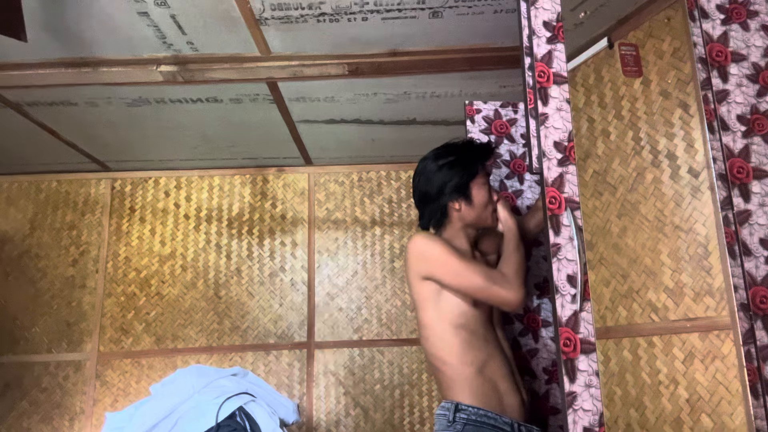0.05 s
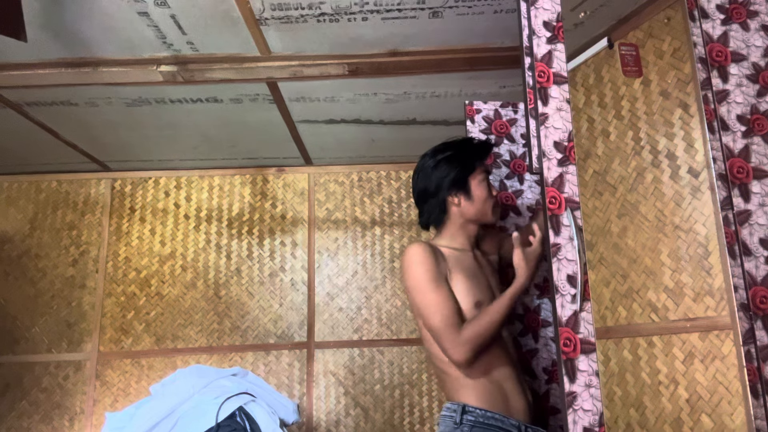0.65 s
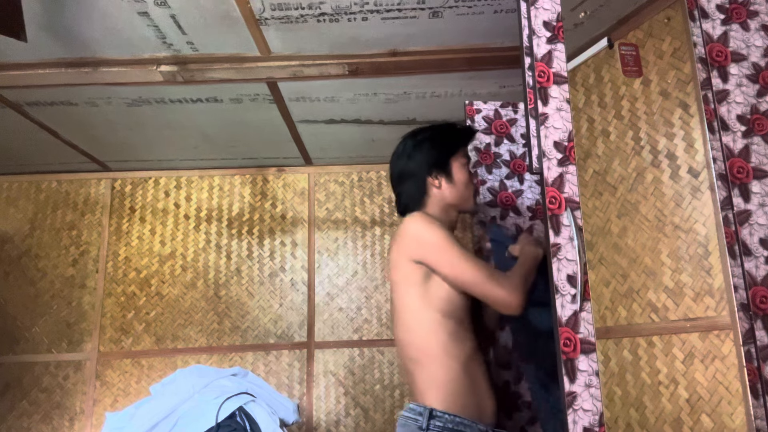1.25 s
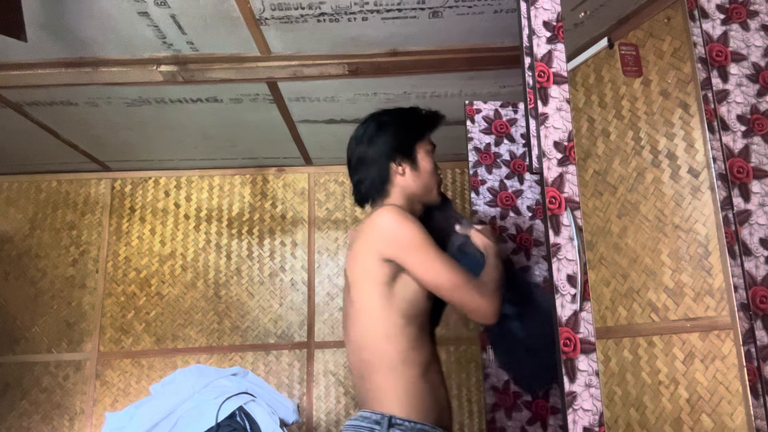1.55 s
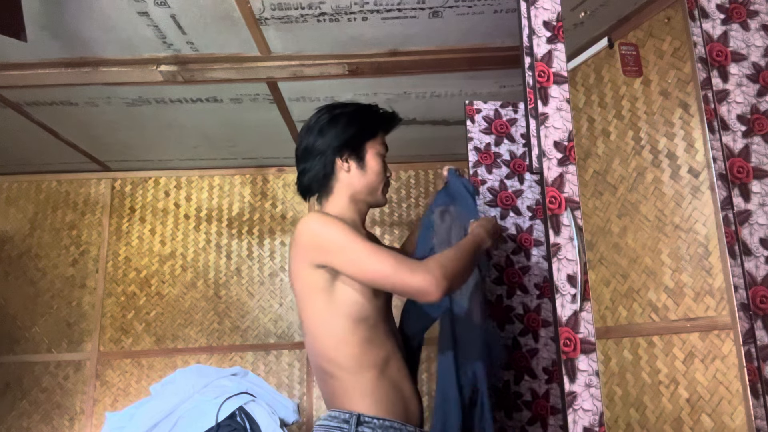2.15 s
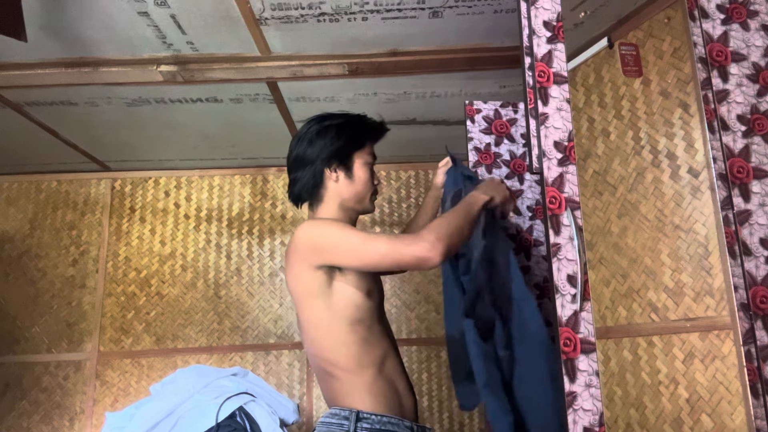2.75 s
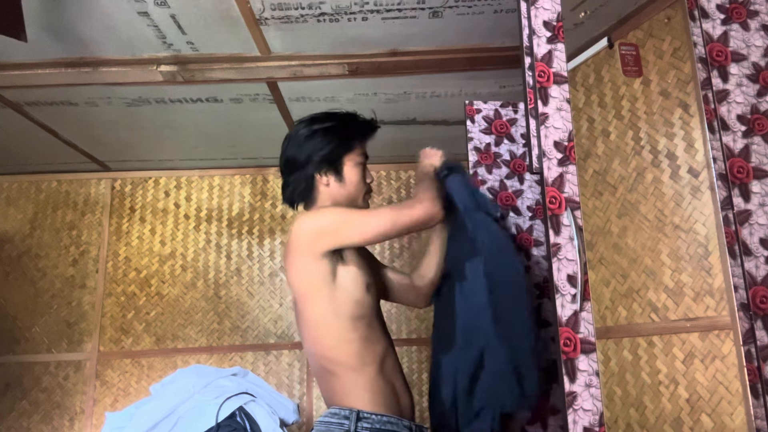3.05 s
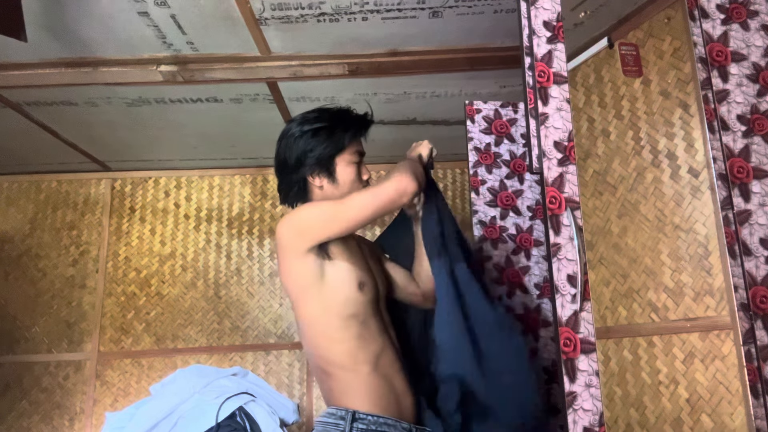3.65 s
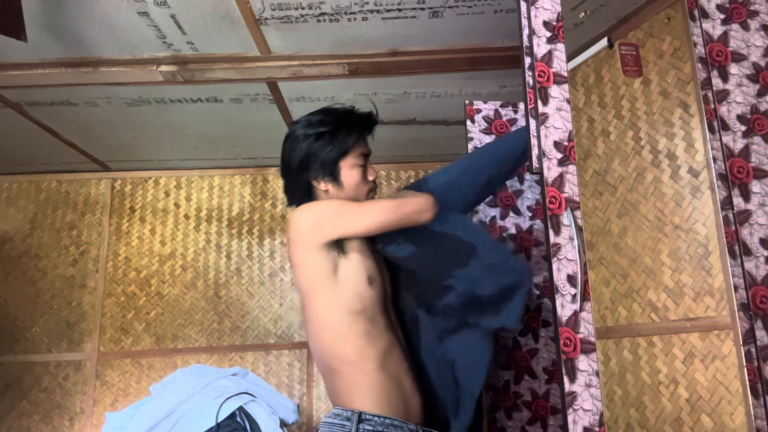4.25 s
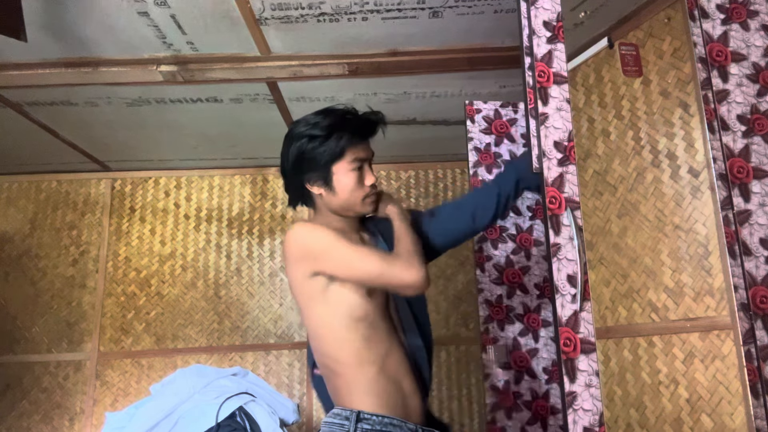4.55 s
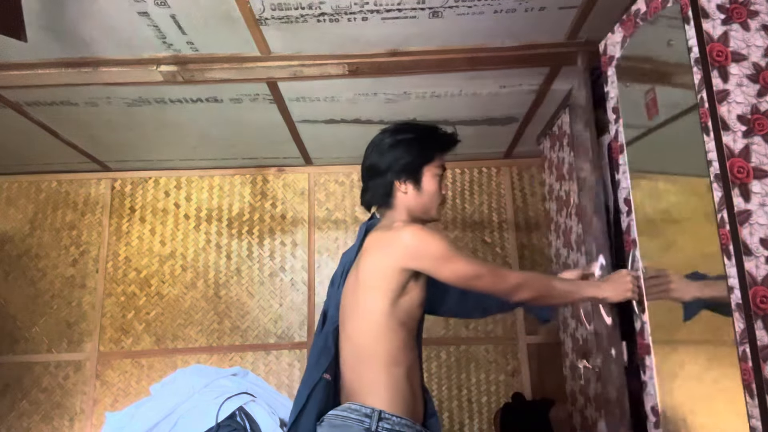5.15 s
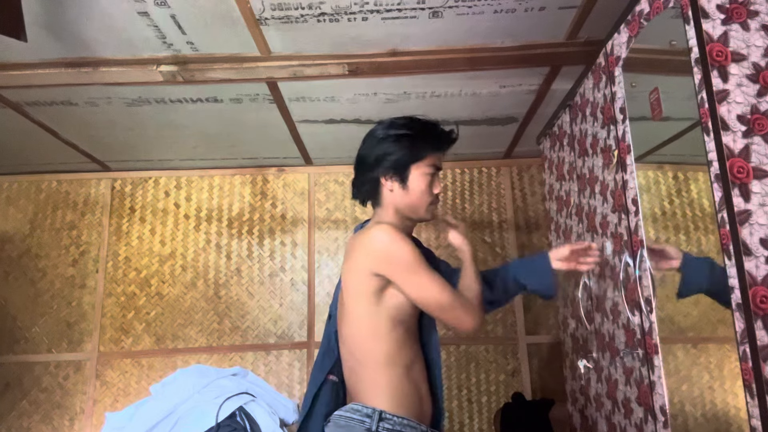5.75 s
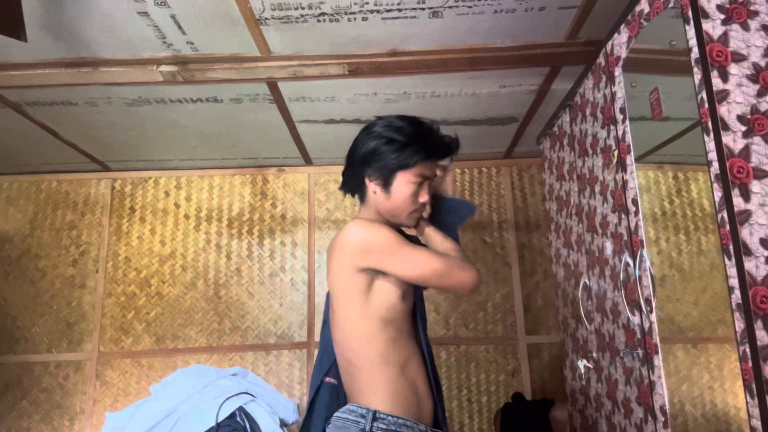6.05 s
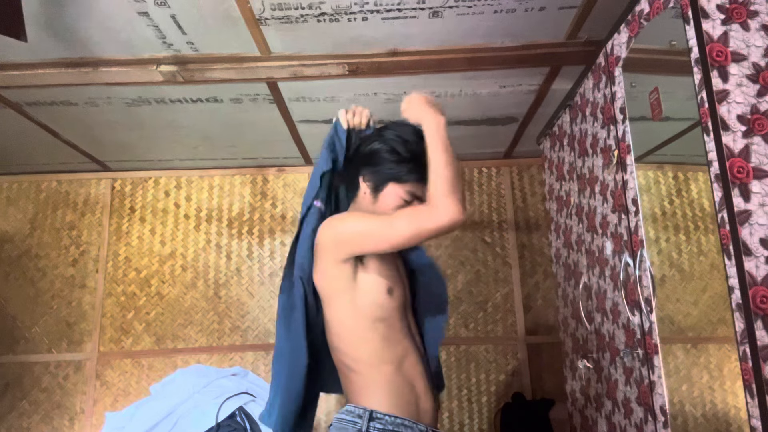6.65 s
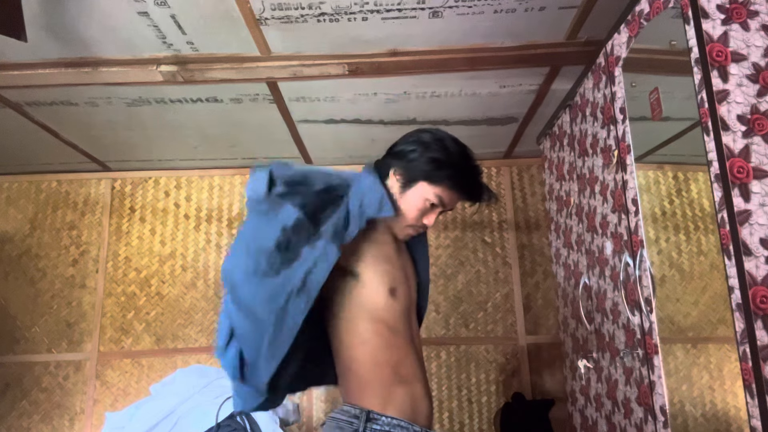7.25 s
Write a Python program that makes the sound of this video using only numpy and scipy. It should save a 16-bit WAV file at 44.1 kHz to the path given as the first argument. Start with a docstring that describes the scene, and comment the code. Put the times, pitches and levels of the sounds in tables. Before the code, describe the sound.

A tight wooden wardrobe door scrapes and knocks, and a hanger rattles briefly as a shirt is taken out. The fabric rubs, crinkles and flaps while someone pulls it on. Several dull knocks and a metallic click lead to the door closing with a low thud, followed by more soft rustling. Everything is heard from nearby in a small room with a quiet rumble underneath.

```python
"""A soft scuff of cloth over a low rumble comes first; then a wooden wardrobe door judders and knocks.
In the small room a hanger clinks, and a shirt is taken out and pulled on: it rubs, buckles and flaps.
The catch snaps, the door thuds shut and the cloth rustles on. The sound cuts out twice for an instant.
Impacts and stick-slip friction excite the damped modes of wood and metal; the cloth is friction noise,
shaped by each stroke and coloured by reflections from close surfaces."""
import sys
import numpy as np
from scipy import signal
from scipy.fft import rfft, irfft
from scipy.io import wavfile
from scipy.ndimage import uniform_filter1d

SR = 44100
rng = np.random.default_rng(int(sys.argv[2]) if len(sys.argv) > 2 else 0)


def dump(signal):
    """Clip the signal to [-1, 1] and save it as 16-bit WAV at the path in sys.argv[1]."""
    limited = np.clip(np.atleast_2d(signal).T, -1, 1)
    pcm = np.round(limited * 32767).astype(np.int16)
    wavfile.write(sys.argv[1], SR, pcm)


N = 326272
TIME = np.arange(N) / SR
TAIL = TIME[:SR]  # time axis of an impulse response

# reverberation of the room: (frequency [Hz], t60 [s])
ROOM_T60 = [(80, 0.97), (260, 0.35), (700, 0.54), (2000, 0.44), (5000, 0.82), (12000, 0.039)]
# stereo width: (frequency [Hz], side minus mid [dB])
WIDTH = [(40, -16), (75, -15), (170, -10.5), (300, -6), (500, -1.5), (1100, -2.5), (3500, -1.5),
         (6000, 1.5), (8200, -2), (9400, -31), (10500, -33), (11800, 4), (15000, 0.5)]
# silent instants: (start [s], end [s])
DROPOUTS = [(4.668, 4.718), (7.301, 7.348)]
# shifts of weight that sway floor and cabinet: (start [s], level [dB], decay [dB/s])
HEAVES = [(-.07, -40.5, 170), (.3, -40.5, 36), (.64, -38.5, 17.5), (4.88, -45.5, 18), (5.52, -34, 27.5)]
# noise spectra of room, cloth, wood and metal: (frequency [Hz], relative spectral density [dB])
AIR_COLOUR = [(25, -9), (60, 7.5), (120, -10), (175, 4), (250, -33.5), (500, -38), (1000, -31),
              (3000, -34.5), (8000, -46), (15000, -61)]
SWAY_COLOUR = [(20, -59), (33, -7), (48, 1), (70, -1), (105, -10), (170, -16), (260, -24), (600, -91)]
RUB_COLOUR = [(100, -9), (300, -5), (800, 2.5), (1500, 3.5), (3000, 2), (5000, -0.5), (7000, -3),
              (9000, -2), (11000, -4.5), (13000, -13), (15000, -3)]
FOLD_COLOUR = [(60, -1.5), (150, 6.5), (300, 5.5), (550, -1.5), (680, -0.5), (810, -3.5), (1000, -8.5),
               (1400, -8), (2500, -12.5), (6000, -31)]
FLAP_COLOUR = [(40, -34), (88, 17.5), (140, -20), (300, 5), (500, -6.5), (1000, -6.5), (3000, -42),
               (8000, -30)]
CREASE_COLOUR = [(150, -3), (800, 0), (1500, -7), (3000, -22), (8000, -31)]
FRAME_COLOUR = [(40, -25), (90, 2.5), (145, -3.5), (220, -2.5), (300, -10.5), (500, -23.5), (800, -27.5),
                (1120, -23), (1450, -37.5), (3000, -49.5), (8000, -74)]
RASP_COLOUR = [(150, -12), (400, 11), (600, 8), (800, 7.5), (1180, 8), (1450, -6.5), (1900, -3.5),
               (3200, -15), (8000, -23), (14000, -63)]
BOOM_COLOUR = [(30, -20), (60, 7), (100, -6), (160, 5), (205, -8.5), (245, -12), (310, -4), (500, -23),
               (1200, -58)]
PANEL_COLOUR = [(100, -5), (220, 2.5), (310, 7), (500, 1.5), (700, -6.5), (950, -9), (1300, -20.5),
                (2500, -24.5), (6000, -38.5)]
CRACK_COLOUR = [(200, 7), (550, 17.5), (950, 13.5), (1400, 8.5), (2200, -0.5), (3500, -8.5), (7000, -28),
                (14000, -60)]
METAL_COLOUR = [(400, 4), (1200, 4.5), (2100, 9.5), (3300, 6), (6000, -0.5), (8500, 0), (11000, -1.5),
                (15000, -32)]

# cloth sliding over cloth and skin: (start [s], rise [s], length [s], hiss [dB], loose folds [dB])
STROKES = [(-.02, 0.018, 0.01, -66.5, -63), (0.19, 0.033, 0.056, -75.5, -89), (0.38, 0.026, .17, -82, -77),
           (0.543, 0.057, 0.12, -74, -72), (0.646, 0.046, 0.517, -68, -55.5),
           (1.086, 0.19, 0.43, -63.5, -55), (1.603, 0.011, 0.098, -65.5, -60.5),
           (1.717, 0.056, 0.08, -59.5, -78), (1.817, 0.024, 0.16, -66.5, -53),
           (1.944, 0.027, 0.22, -66.5, -85), (2.14, 0.15, 0.87, -74, -70.5),
           (2.514, 0.091, 0.089, -66, -56.5), (2.776, 0.13, 0.034, -60.5, -116),
           (3.044, 0.026, 0.26, -59, -50), (3.071, 0.076, 0.1, -52.5, -52.5), (3.316, 0.1, 0.66, -65, -57),
           (3.646, 0.031, 0.031, -65, -50), (3.788, 0.072, 0.29, -57, -53), (4.08, 0.083, 0.31, -59, -54.5),
           (4.463, 0.071, 0.11, -62, -62), (4.725, 0.025, 0.37, -76.5, -75), (4.917, 0.11, 0.4, -66, -60),
           (5.492, 0.056, 0.081, -65, -78), (5.773, 0.012, 0.14, -72.5, -76),
           (5.943, 0.27, 0.44, -66.5, -68), (6.129, 0.042, 0.04, -86, -55.5),
           (6.42, 0.094, 0.28, -69, -65.5), (6.578, 0.23, 0.46, -63, -61), (6.887, 0.089, 0.13, -61, -55.5),
           (7.03, 0.076, 0.48, -61.5, -57)]
# an arm in the sleeve: (start [s], length [s], first, middle and last thread rate [Hz], level [dB])
SLEEVE_ZIPS = [(3.129, 0.054, 3100, 2700, 2550, -51), (3.761, 0.085, 1410, 1600, 3000, -53),
               (3.825, 0.28, 2830, 4340, 4440, -56), (3.86, .2, 5980, 7850, 5600, -54.5),
               (4.19, 0.2, 6300, 6500, 3960, -59)]
# cloth scuffing over a hollow fold: (start [s], length [s], resonance [Hz], level [dB])
SCUFFS = [(0.0, 0.037, 2600, -68), (6.131, 0.15, 990, -60.5), (6.546, 0.037, 740, -56.5),
          (6.798, 0.026, 694, -55.5), (7.234, .06, 1290, -58.5)]
# creases buckling: (time [s], level [dB])
CREASES = [(1.875, -57), (1.935, -57), (1.953, -53), (1.967, -50), (3.075, -58), (3.14, -56), (3.272, -48),
           (3.374, -57), (3.848, -50), (3.873, -51), (4.303, -55), (6.812, -61)]
# the shirt pulled taut: (time [s], level [dB], time constant [s])
FLAPS = [(1.814, -49.5, 0.024), (3.071, -48, 0.016), (3.227, -42.5, 0.027), (3.27, -48, 0.013),
         (3.654, -46.5, 0.034), (3.856, -50, 0.027), (4.295, -42.5, 0.023), (7.207, -53, 0.0089)]

# pushes that drag the door in its frame: (start [s], rise [s], length [s], slip force [dB], rasp [dB])
PUSHES = [(0.188, 0.039, 0.11, -32.5, -63), (0.649, 0.032, 0.046, -25, -63),
          (0.691, 0.026, 0.034, -30.5, -41), (0.742, 0.019, 0.044, -31.5, -48),
          (5.386, 0.036, 0.06, -46, -54.5), (5.432, 0.024, 0.034, -36, -51),
          (5.548, 0.064, 0.095, -29.5, -48), (5.682, 0.024, 0.116, -45, -56.5),
          (5.778, 0.028, 0.066, -46, -61)]
# blows on the wardrobe: (time [s], cabinet boom [dB], door panel [dB], edge crack [dB])
BLOWS = [(0.674, -41, -49, -78), (0.698, -27, -49, -57), (0.838, -58, -31.5, -35),
         (.849, -26.5, -26.5, -42), (0.887, -47, -66, -46), (1.3, -38.5, -40.5, -41),
         (4.729, -48, -72, -86), (4.929, -45, -50, -57), (4.959, -40, -75, -80), (5.037, -37, -41, -58),
         (5.143, -38, -42.5, -38.5), (5.199, -38.5, -65, -59), (5.314, -62, -36, -56),
         (5.331, -32, -38, -68), (5.457, -52, -56, -37.5), (5.479, -16.5, -34.5, -47),
         (5.532, -23.5, -54, -66), (5.586, -25.5, -38, -48), (5.626, -50, -46, -45.5),
         (5.661, -30, -45, -63)]
# impacts on the smaller parts: (time [s], level [dB])
HANGER_CLINKS = [(1.393, -44), (1.409, -46), (1.445, -50), (1.751, -67), (1.773, -59), (1.792, -57.5),
                 (2.576, -62.5)]
HOOK_TICKS = [(1.487, -45.5), (1.758, -51.5)]
BUTTON_TAPS = [(1.63, -57.5)]
CATCH_SNAPS = [(4.928, -59.5), (5.017, -40.5)]
SHELF_KNOCKS = [(1.301, -29), (1.352, -32.5), (5.479, -42.5), (5.56, -43)]
# normal modes of each part: (frequency [Hz], relative level [dB], t60 [s])
HANGER_MODES = [(1550, -0.5, 0.29), (2094, 1, 0.17), (2338, 6, 0.16), (2404, -3, 0.28), (2892, -0.5, 0.16),
                (3910, 5, 0.17), (4480, 4.5, 0.065), (6050, 0, 0.079), (6640, -1, 0.081)]
HOOK_MODES = [(3470, -2, 0.22), (3560, 0, 0.065), (3850, 4, 0.083)]
BUTTON_MODES = [(1560, -1, .025), (1960, 0, 0.046), (2770, -12, 0.022)]
CATCH_MODES = [(1865, 3, 0.16), (1925, 4.5, 0.19), (2174, 2, 0.17), (2870, 5, 0.13), (3400, -3, .08),
               (4570, -1, 0.13), (7870, 0, 0.037), (8270, 3.5, 0.092)]
FRAME_MODES = [(102.5, -0.5, 0.18), (134.3, 7.5, 0.082), (163.25, -6.5, 0.4), (186, -10.5, 0.78),
               (233.5, -2.5, 0.15), (292.8, 2, 0.085), (375, -8, 0.25), (716, -10, 0.074),
               (1107, -18, 0.26), (1220, -24.5, 0.28)]  # the door frame with its mirror
CABINET_MODES = [(50, 0, 0.43), (73, 7, 0.37), (88.8, 16, 0.21), (139.6, 9.5, 0.15), (156.1, 2, 0.36),
                 (245.7, 0.5, 0.16), (292.4, -17, 0.37)]
PANEL_MODES = [(350, 3, 0.19), (383, 6.5, 0.3), (462, 7, 0.35), (487, 6.5, 0.55), (836, 4.5, 0.096),
               (910, 1, 0.13), (984, -20, 0.4), (1240, -11.5, 0.29)]
EDGE_MODES = [(1254, 12, 0.013), (1780, -19, 0.034), (2732, -11, 0.083)]
SHELF_MODES = [(141.6, -3, 0.16), (299.4, 5, 0.27), (355, 9, 0.15), (395, -3.5, 0.23), (505, -3, 0.17),
               (545, -1, 0.28), (773, -1.5, 0.33)]

STROKE_RELEASE_DB_PER_S = 127  # the cloth settles after each stroke
CRACK_GAIN, CRACK_S = 1.8, 0.014  # extra gain and time constant of an impact's onset
GRIP_S = 4.6  # from here on a hand holds the door


def amp(db):
    """Amplitude ratio of a level in decibels."""
    return 10 ** (np.asarray(db) / 20)


def rms_one(x):
    """Normalisation to unit rms."""
    return x / np.sqrt(np.mean(x ** 2) + 1e-20)


def at_hz(points, hz):
    """Interpolation of a table on a log-frequency axis."""
    freqs, values = np.transpose(points)
    return np.interp(np.log(np.maximum(hz, 1)), np.log(freqs), values)


def drift(per_s):
    """Random fluctuation of unit rms, linear between per_s values a second."""
    knots = rng.standard_normal(4096)
    return rms_one(np.interp(TIME * per_s, np.arange(len(knots)), knots))


def gesture(start, rise, length, release_db_per_s, sag_db_per_s=0):
    """Envelope of one movement: a smooth attack, a hold that may sag, an exponential release."""
    age = TIME - start
    attack = np.sin(np.pi / 2 * np.clip(age / rise, 0, 1)) ** 2
    sag_db = sag_db_per_s * np.maximum(age - rise, 0)
    release_db = release_db_per_s * np.maximum(age - length, 0)
    return attack * amp(-sag_db - release_db)


def colour(pair, spectrum):
    """Spectral shaping: two independent signals, as mid and side, give a stereo pair of unit rms."""
    size = pair.shape[1]
    hz = np.fft.rfftfreq(size, 1 / SR)
    mid, side = irfft(rfft(pair) * amp(at_hz(spectrum, hz)) * (hz > 15), size)
    side = irfft(rfft(side) * amp(at_hz(WIDTH, hz)), size)
    return rms_one(np.array([mid + side, mid - side]))


def noise(spectrum, size=N):
    """Gaussian stereo noise with a given spectrum."""
    return colour(rng.standard_normal((2, size)), spectrum)


def strikes(rows):
    """Brief contacts act as impulses, one per (time [s], level [dB])."""
    force = np.zeros(N)
    for time, db in rows:
        force[int(time * SR)] = amp(db)
    return force


def grains(per_s, spread_db):
    """A Poisson process: independent impulses of random size and sign."""
    size = amp(spread_db * np.minimum(rng.exponential(1, N), 4))
    return (rng.random(N) < per_s / SR) * size * rng.choice([-1, 1], N)


def excite(force, response):
    """A linear system convolves the force with its impulse response."""
    return signal.fftconvolve(force[None], response, axes=1)[:, :N]


def unit_attack(response):
    """Normalisation to unit rms over the first 30 ms."""
    return response / np.sqrt(np.mean(response[..., :int(0.03 * SR)] ** 2))


def diffuse(spectrum, direct, direct_s):
    """Reverberation: after a direct burst, each octave of the diffuse field decays at its own rate."""
    source = rfft(noise(spectrum, size=SR))
    hz = np.arange(SR // 2 + 1)
    octave = np.clip(np.log2(np.maximum(hz, 1) / 62.5), 0, 8)
    out = 0
    for k in range(9):
        band = irfft(source * np.maximum(1 - abs(octave - k), 0), SR)
        out += band * amp(-60 * TAIL / at_hz(ROOM_T60, 62.5 * 2 ** k))
    return unit_attack(out * (1 + direct * np.exp(-TAIL / direct_s)))


def near_walls(x, paths_ms, echo_db, travel_ms):
    """Comb filtering: echoes from close surfaces interfere, and their delays vary as the arms move."""
    out, n = x, np.arange(N)
    for path in paths_ms:
        lag = (path + travel_ms * drift(2.5)) * SR / 1000
        out = out + amp(echo_db) * np.array([np.interp(n - lag, n, channel) for channel in x])
    return out / np.sqrt(1 + len(paths_ms) * amp(2 * echo_db))


def ringing(modes, wander=0):
    """Free vibration is a sum of damped sinusoids; a phase difference between channels gives width."""
    out = 0
    for hz, db, t60 in modes:
        skew = np.arctan(amp(at_hz(WIDTH, hz))) * rng.choice([-1, 1]) * np.array([[1], [-1]])
        cycles = hz * np.cumsum(1 + wander * drift(50)[:SR]) / SR
        out += amp(db - 60 * TAIL / t60) * np.sin(2 * np.pi * cycles + skew)
    return unit_attack(out)


def wood(modes, spectrum, modes_db, room_db, rise_s):
    """Impulse response of a wooden part: modes and reverberation build up over the contact time."""
    wash = diffuse(spectrum, direct=0.8, direct_s=0.1)
    ring = ringing(modes, wander=0.0079)  # joints shift, so the pitch wanders
    return (amp(modes_db) * ring + amp(room_db) * wash) * (1 - np.exp(-TAIL / rise_s))


def background(swing):
    """Incoherent sources add in power: standing, swinging and heaving rock the floor under quiet air."""
    standing = amp(-61 + 0.5 * drift(2.7))
    rocking = amp(-5.5) * swing
    power = standing ** 2 + rocking ** 2
    for start, db, decay in HEAVES:
        power += (amp(db) * gesture(start, rise=0.061, length=0.061, release_db_per_s=decay)) ** 2
    return noise(SWAY_COLOUR) * np.sqrt(power) + amp(-59) * noise(AIR_COLOUR)


def strokes():
    """Envelopes of the cloth's rubbing and its folds' swinging; overlapping strokes add in power."""
    rub_power, swing_power = 0, 0
    for start, rise, length, hiss_db, folds_db in STROKES:
        power = gesture(start, rise, length, STROKE_RELEASE_DB_PER_S) ** 2
        rub_power += power * amp(hiss_db) ** 2
        swing_power += power * amp(folds_db) ** 2
    return np.sqrt(rub_power), np.sqrt(swing_power)


def rubbing(rub):
    """Friction noise: threads catch and slip in dense grains, more often as the sliding quickens."""
    per_s = 5000 * np.sqrt(rub / rub.max())
    threads = np.array([grains(per_s, spread_db=2.5), grains(per_s, spread_db=-5)]) / np.sqrt(per_s)
    hiss = colour(rms_one(threads) + 2.7 * rng.standard_normal((2, N)), RUB_COLOUR)
    return hiss * rub * amp(7 + 0.92 * drift(45))


def sleeve():
    """Threads crossing periodically make a narrow band of noise, a zip whose pitch follows arm speed."""
    blur_filter = signal.butter(2, 220, fs=SR, output="sos")
    out = 0
    for start, length, first_hz, middle_hz, last_hz, db in SLEEVE_ZIPS:
        along = np.clip((TIME - start) / length, 0, 1)
        hz = np.polyval(np.polyfit([0, 0.5, 1], [first_hz, middle_hz, last_hz], 2), along)
        cycles = np.cumsum(hz * (1 + 0.032 * drift(700))) / SR  # threads lie unevenly
        blur = rms_one(signal.sosfilt(blur_filter, rng.standard_normal((2, N))))
        arch = 2 * np.sqrt(along * (1 - along))
        out += amp(db) * arch * blur * np.sin(2 * np.pi * cycles)
    return out


def scuffs():
    """Cavity resonance: a hollow of the cloth selects one band of the friction noise."""
    friction, out = noise(RUB_COLOUR), 0
    for start, length, hz, db in SCUFFS:
        hollow = rms_one(signal.lfilter(*signal.iirpeak(hz, Q=2.9, fs=SR), friction))
        out += amp(db) * hollow * gesture(start, 0.024, length, STROKE_RELEASE_DB_PER_S)
    return out


def creases(swing):
    """Buckling: a taut crease gives way with a dry pop; small ones crinkle as the folds swing."""
    crinkles = amp(-11.5) * swing * grains(per_s=35, spread_db=1)
    return excite(strikes(CREASES) + crinkles, diffuse(CREASE_COLOUR, direct=4.3, direct_s=0.0032))


def folds(swing):
    """Moving cloth displaces air: loose folds murmur, and the shirt flaps when pulled taut."""
    murmur = noise(FOLD_COLOUR) * swing * amp(1.5 + 1.32 * drift(50))
    puffs = 0
    for time, db, time_constant in FLAPS:
        age = np.maximum(TIME - time, 0) / time_constant
        puffs += amp(db) * np.sqrt(2 * np.e * age) * np.exp(-age)
    return murmur + noise(FLAP_COLOUR) * puffs


def fittings():
    """Small stiff bodies ring high: hanger and hook on the rail, a button on the door, the catch."""
    clatter = diffuse(METAL_COLOUR, CRACK_GAIN, CRACK_S)
    hanger = excite(strikes(HANGER_CLINKS), ringing(HANGER_MODES) + amp(-2.5) * clatter)
    hook = excite(strikes(HOOK_TICKS), amp(-8) * ringing(HOOK_MODES) + amp(-6.5) * clatter)
    button = excite(strikes(BUTTON_TAPS), ringing(BUTTON_MODES))
    catch = excite(strikes(CATCH_SNAPS), amp(-3.5) * ringing(CATCH_MODES) + amp(-1.5) * clatter)
    return hanger + hook + button + catch


def judder():
    """Stick-slip friction: the tight door shakes its frame with uneven pulses while dry wood rasps."""
    slip_hz = 143 * amp(1.3 * drift(110))
    slip_count = np.floor(np.cumsum(slip_hz) / SR)
    slips = np.diff(slip_count, prepend=0) * amp(1.9 * drift(200))
    force, rasp = 0, 0
    for start, rise, length, force_db, rasp_db in PUSHES:
        push = gesture(start, rise, length, release_db_per_s=322, sag_db_per_s=39)
        force = np.maximum(force, amp(force_db) * push)
        rasp = np.maximum(rasp, amp(rasp_db) * push)
    frame = wood(FRAME_MODES, FRAME_COLOUR, modes_db=0, room_db=-8.5, rise_s=0.0034)
    frame /= np.sqrt(np.sum(frame ** 2) / 2)  # unit mean energy per channel
    return excite(rms_one(slips) * force, frame) + noise(RASP_COLOUR) * rasp * amp(drift(140))


def knocks():
    """Impact excitation: cabinet, door panel, edge and shelf ring; a gripping hand damps the panel."""
    times, boom_db, panel_db, crack_db = np.transpose(BLOWS)
    held = times > GRIP_S
    cabinet = wood(CABINET_MODES, BOOM_COLOUR, modes_db=-2, room_db=-6, rise_s=0.0023)
    free_panel = wood(PANEL_MODES, PANEL_COLOUR, modes_db=0.5, room_db=-8, rise_s=0.0029)
    held_panel = wood(PANEL_MODES, PANEL_COLOUR, modes_db=-31, room_db=-3, rise_s=0.0031)
    edge = amp(-1.5) * diffuse(CRACK_COLOUR, CRACK_GAIN, CRACK_S) + amp(-15) * ringing(EDGE_MODES)
    shelf = wood(SHELF_MODES, PANEL_COLOUR, modes_db=-2, room_db=-2.5, rise_s=0.00071)
    boom = excite(strikes(zip(times, boom_db)), cabinet)
    ring = excite(strikes(zip(times[~held], panel_db[~held])), free_panel)
    thud = excite(strikes(zip(times[held], panel_db[held])), held_panel)
    crack = excite(strikes(zip(times, crack_db)), edge)
    crack = near_walls(crack, paths_ms=[1.4, 3.7], echo_db=-6.5, travel_ms=0.286)
    return boom + ring + thud + crack + excite(strikes(SHELF_KNOCKS), shelf)


def scene():
    """Superposition: level differences place the wardrobe, and the shirt beside it, slightly left."""
    wardrobe = knocks() + judder() + fittings()
    rub, swing = strokes()
    shirt = rubbing(rub) + folds(swing) + sleeve() + scuffs() + creases(swing)
    shirt = near_walls(shirt, paths_ms=[1.1, 2.6, 4.9], echo_db=-12, travel_ms=0.252)
    return (background(swing) + shirt) * amp([[0.4], [-0.4]]) + wardrobe * amp([[0.56], [-0.56]])


def record(dry):
    """Band limiting and gating: deep bass is lost, the top treble is antiphase, the sound cuts twice."""
    bass_cut = signal.butter(3, 32, "high", fs=SR, output="sos")
    mid_treble_cut = signal.ellip(8, 0.3, 70, 12400, fs=SR, output="sos")
    treble_cut = signal.ellip(10, 0.3, 80, 15700, fs=SR, output="sos")
    gate = np.ones(N)
    for start, end in DROPOUTS:
        gate[int(start * SR):int(end * SR)] = 0
    left, right = signal.sosfilt(bass_cut, dry) * uniform_filter1d(gate, size=128)
    mid = signal.sosfilt(mid_treble_cut, (left + right) / 2)
    side = (left - right) / 2
    return signal.sosfilt(treble_cut, [mid + side, mid - side])


dry = scene()
out = record(dry)
dump(out)
```